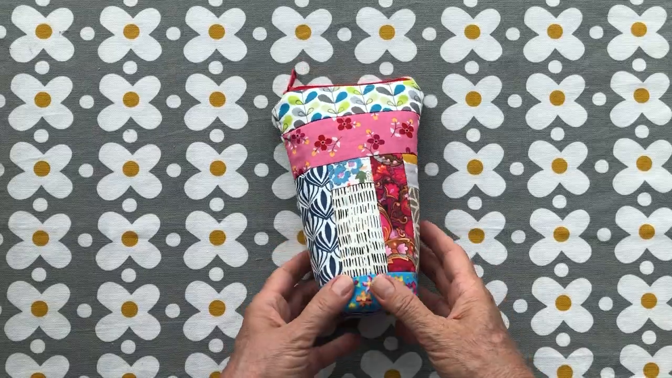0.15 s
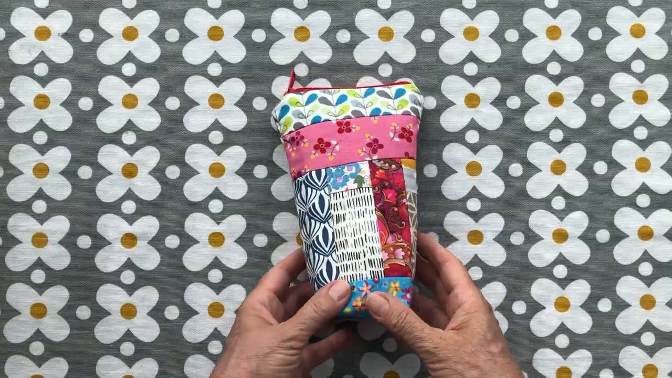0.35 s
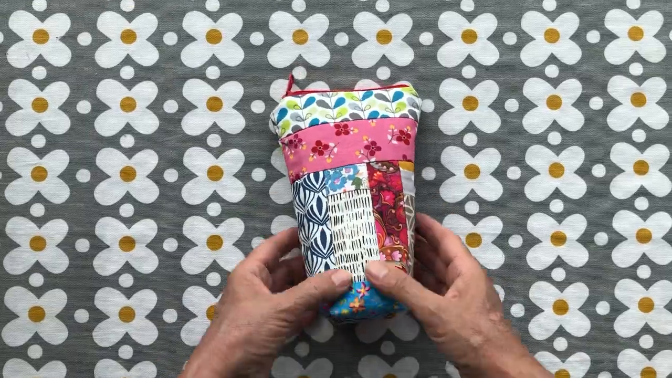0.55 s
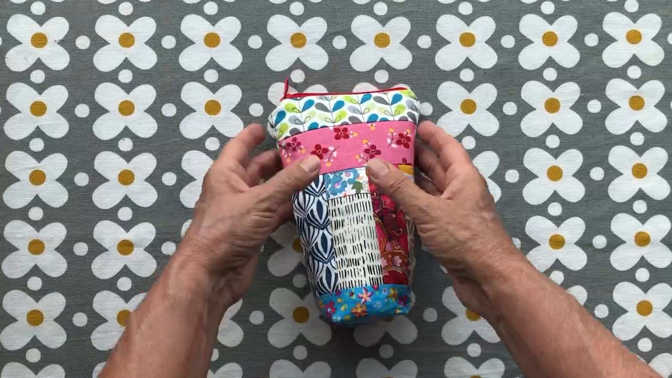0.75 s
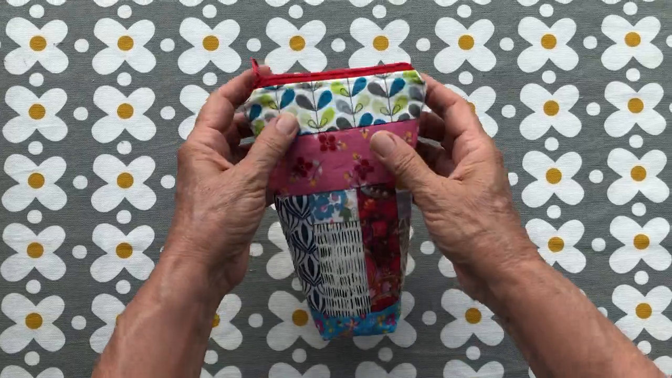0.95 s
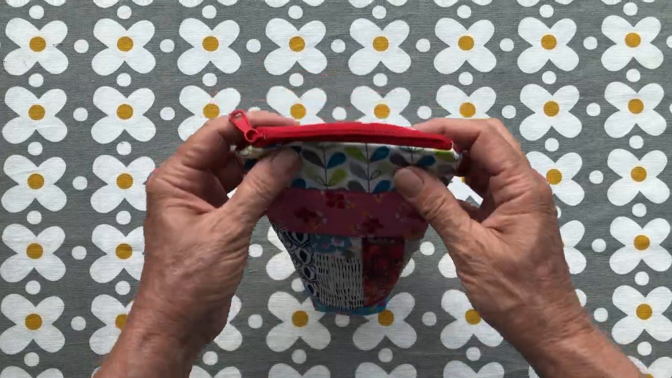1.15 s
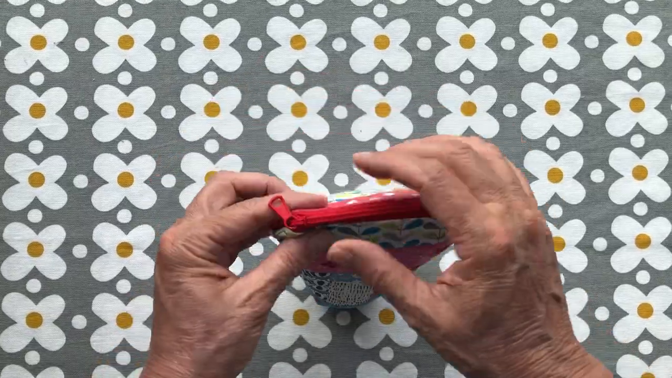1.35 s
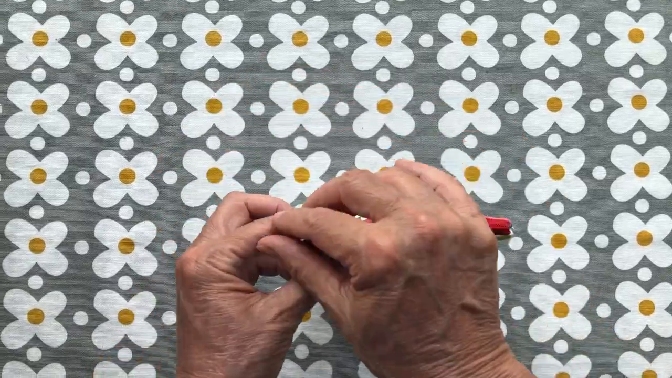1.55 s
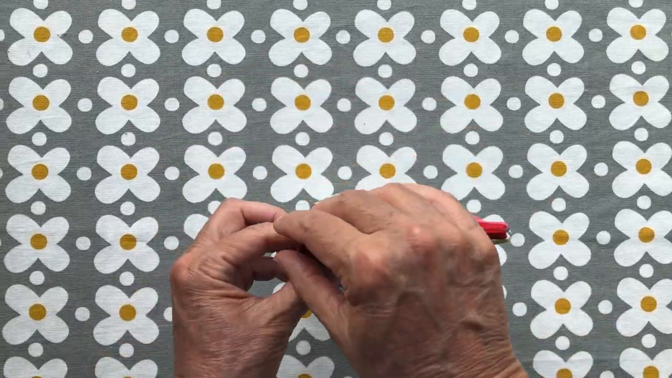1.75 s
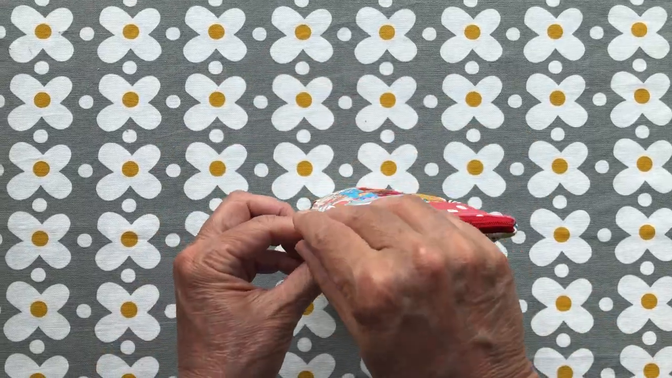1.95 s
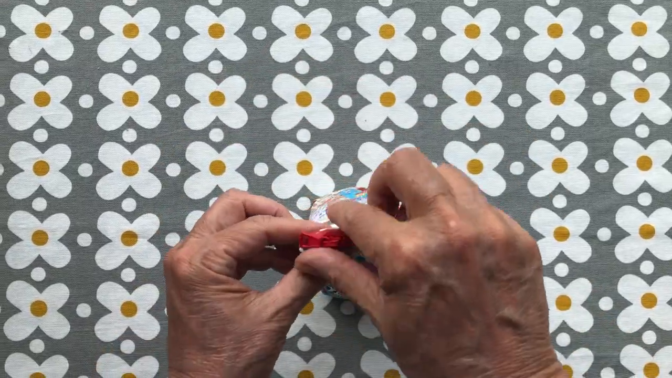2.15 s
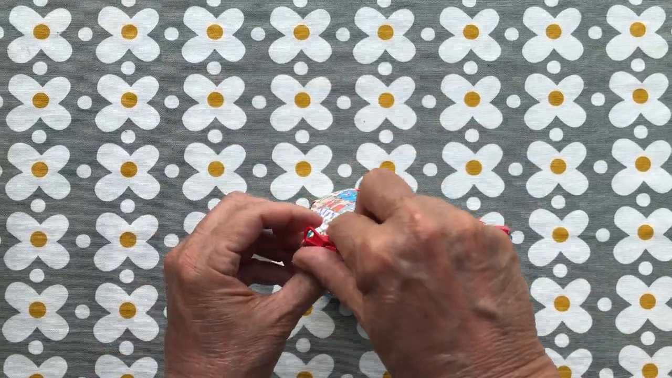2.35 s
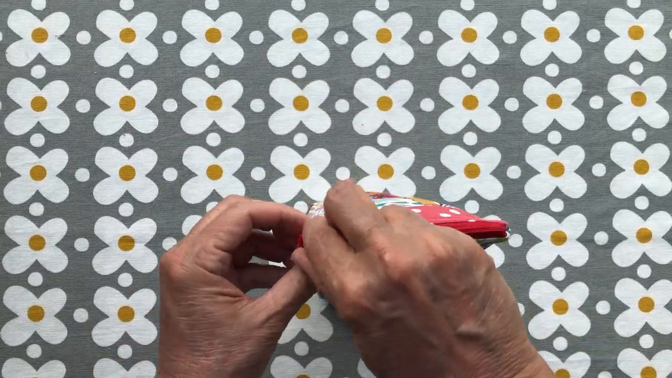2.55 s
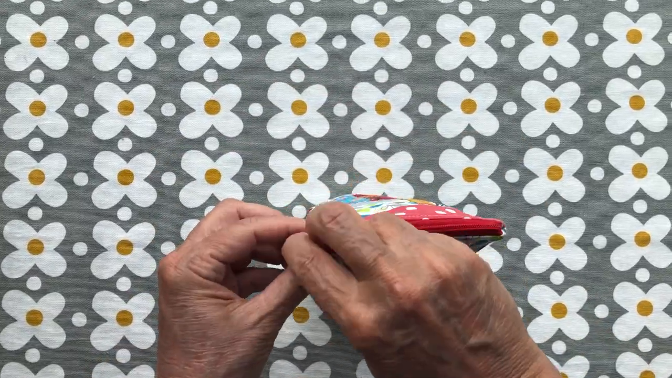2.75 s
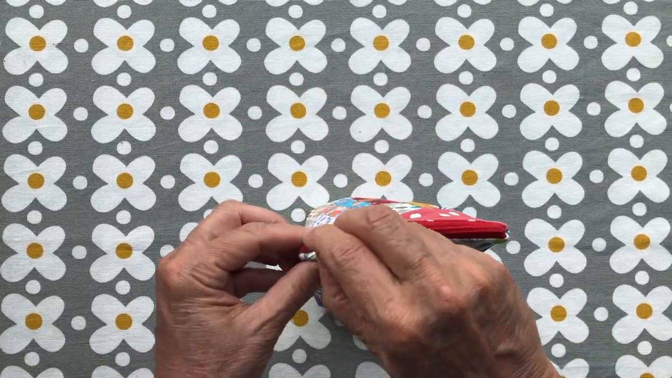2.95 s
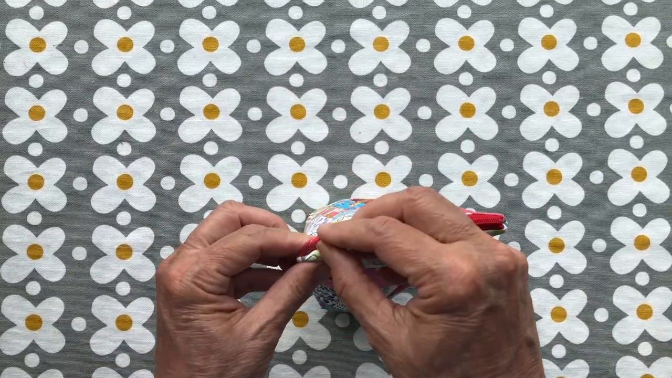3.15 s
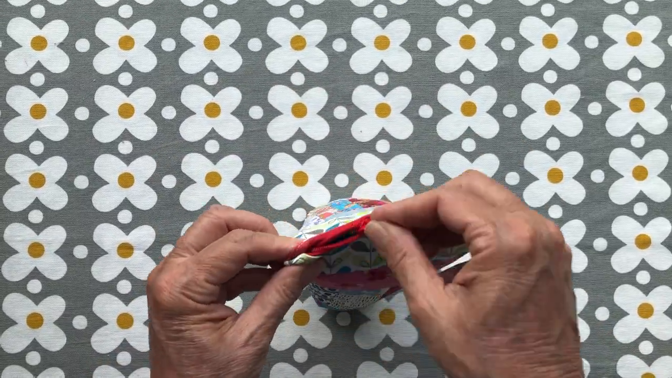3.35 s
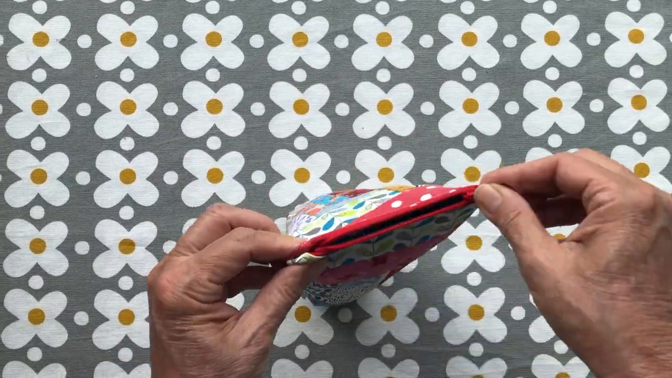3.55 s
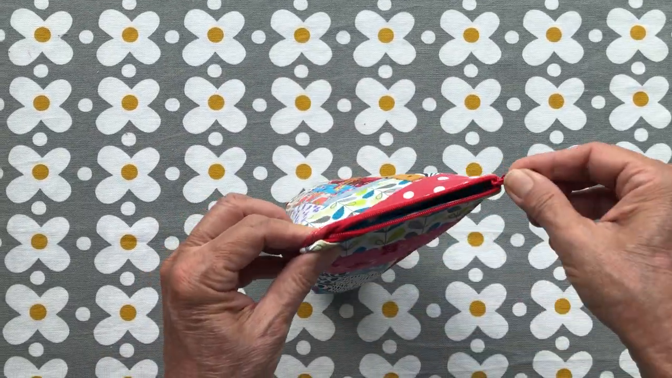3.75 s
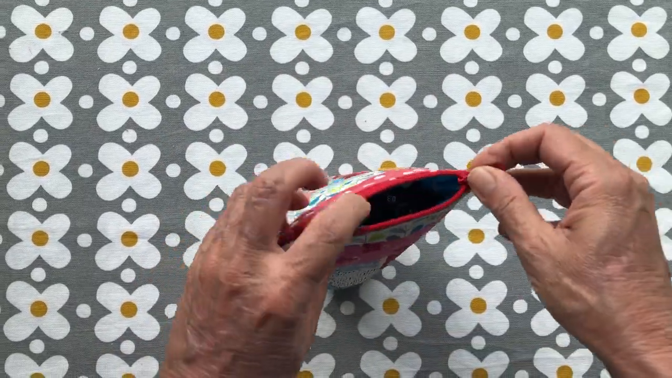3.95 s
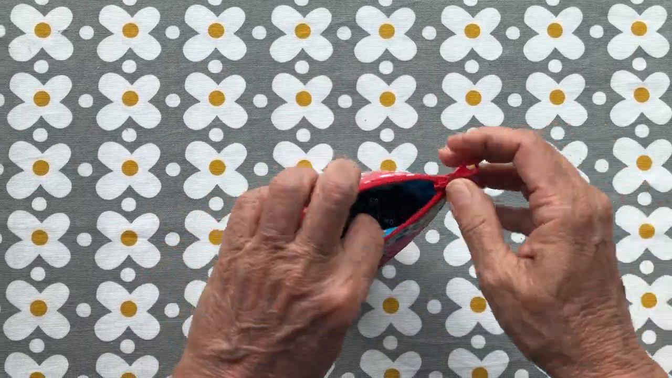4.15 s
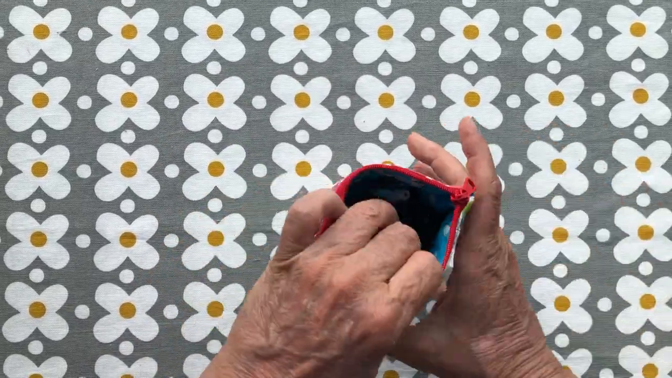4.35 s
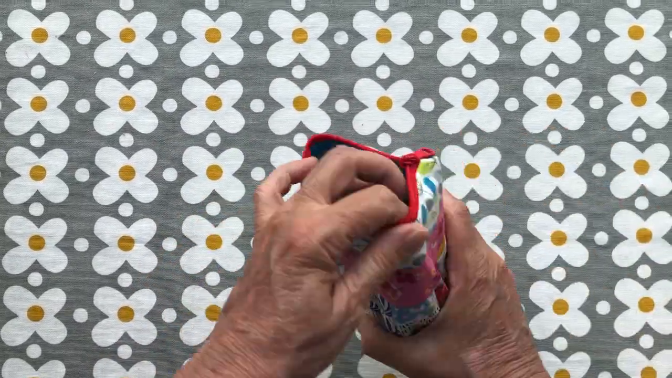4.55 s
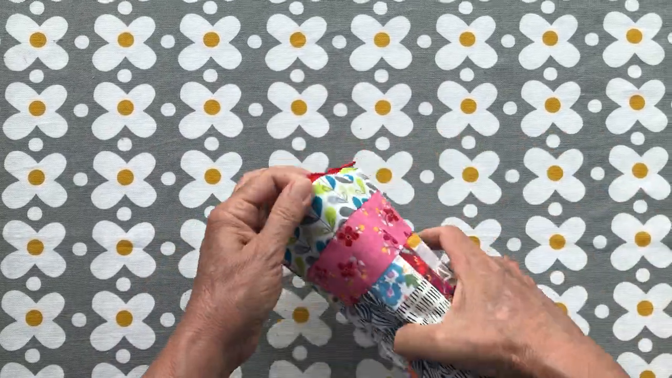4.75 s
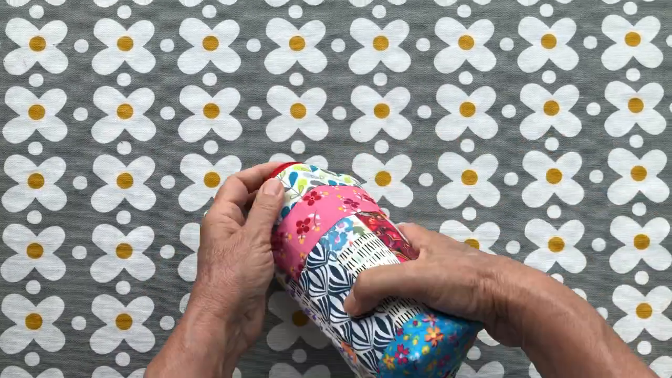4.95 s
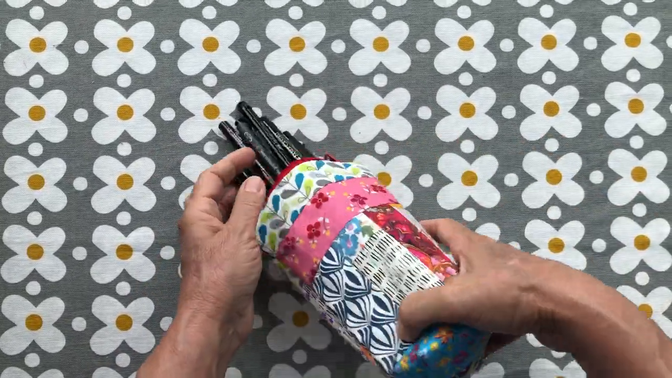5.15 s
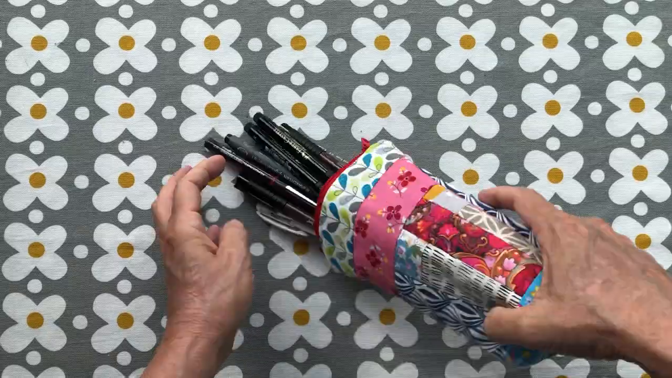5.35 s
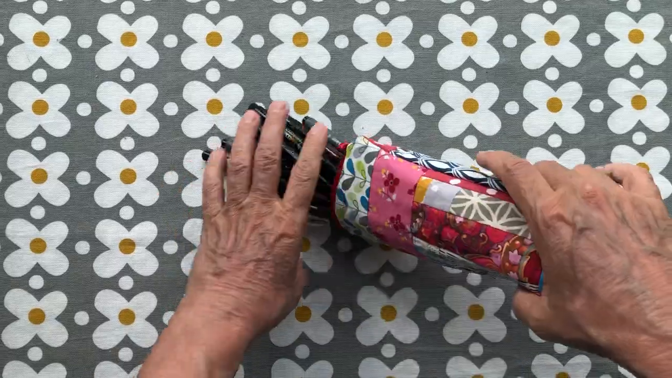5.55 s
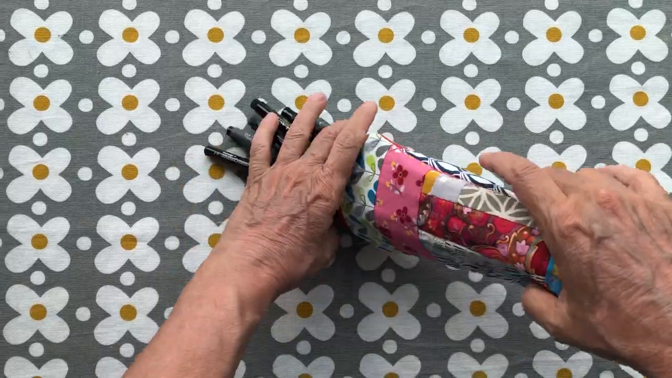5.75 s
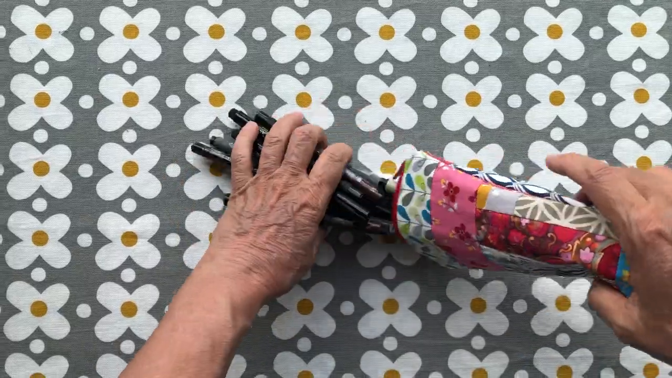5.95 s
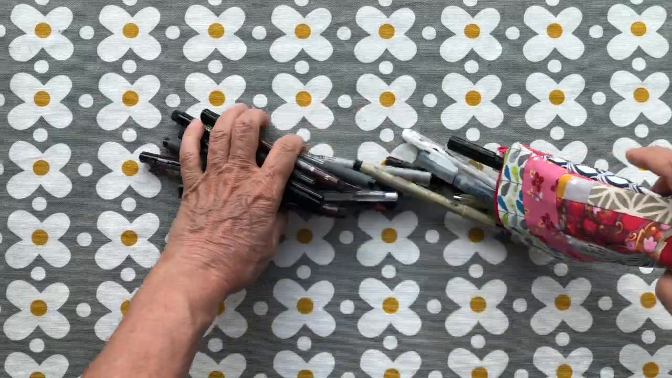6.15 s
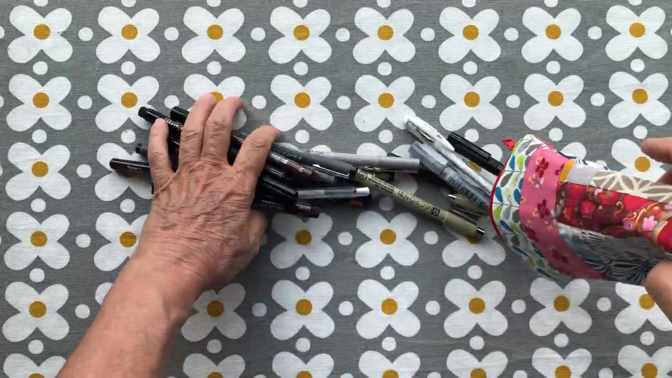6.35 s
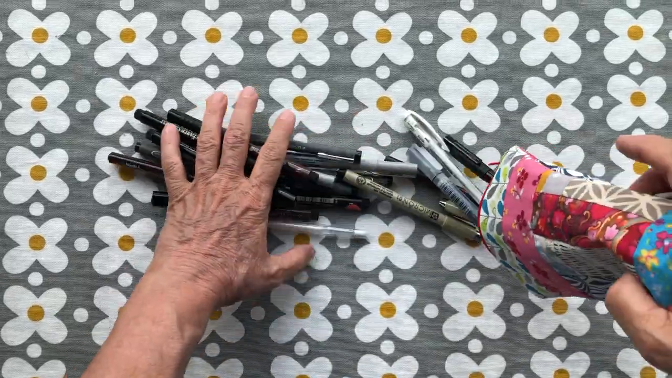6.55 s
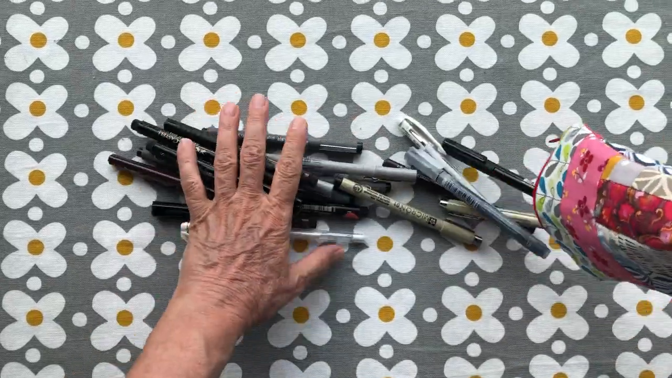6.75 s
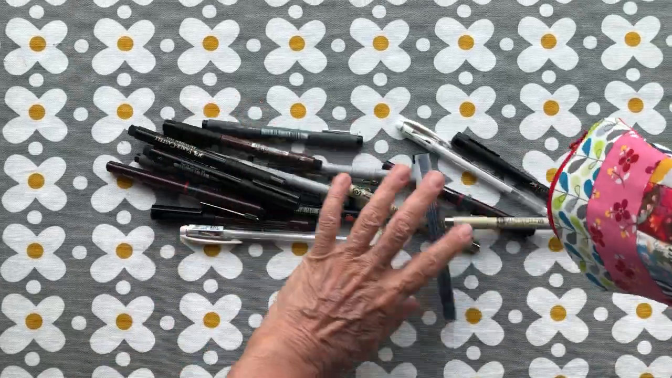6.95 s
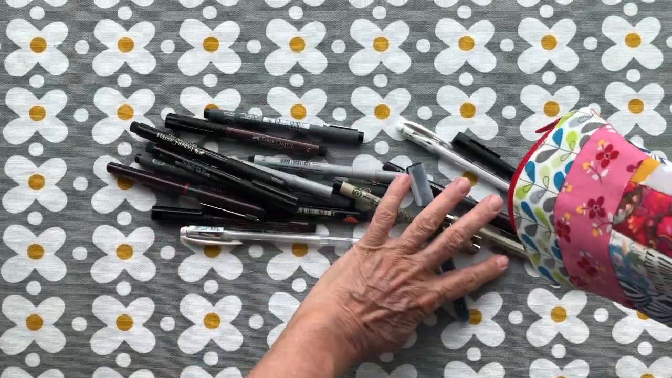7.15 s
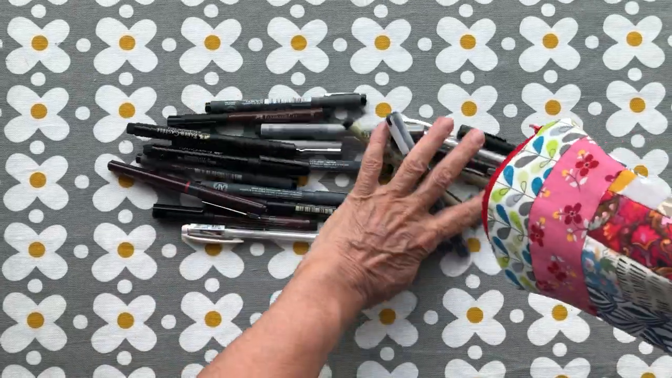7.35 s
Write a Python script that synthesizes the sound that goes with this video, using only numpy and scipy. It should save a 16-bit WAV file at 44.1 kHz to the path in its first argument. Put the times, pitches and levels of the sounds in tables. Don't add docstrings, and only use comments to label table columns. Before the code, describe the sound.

A close microphone in a quiet, dry room with faint low air. In the first 0.15 seconds plastic pens knock, muffled, inside a cloth pouch as it is picked up; fabric slides softly. Sparse faint ticks and rustles follow, with a soft thump on the wooden table near 1.35 and a tiny high metallic jingle around 1.5. It stays nearly still, with light strokes of skin on cloth, until 3.27, when a zipper slider clicks slowly, then speeds into a short rising buzz ending by 3.6. The opened pouch rustles and its pens rattle dully, busier from 4.4 to 4.7. From 4.93 pens spill in bright clacks with low table thuds, ease around 5.4, then pour densely from 5.85 to 6.25. Sharp single drops land near 6.5 and 6.65. From 6.9 to the end a hand spreads the heap, with clustered clicks, rolling and woody drumming.

```python
import sys
import numpy as np
from scipy import signal
from scipy.fft import rfft, irfft, next_fast_len
from scipy.io import wavfile
from scipy.ndimage import uniform_filter1d, map_coordinates

SR = 44100
rng = np.random.default_rng(int(sys.argv[2]) if len(sys.argv) > 2 else 0)


def store_wav(level_fs):
    pcm = np.round(np.clip(np.atleast_2d(level_fs), -1, 1) * 32767)
    wavfile.write(sys.argv[1], SR, pcm.T.astype(np.int16))


def nominal_scale(level):
    x = np.asarray(level, float) / 20
    return 10 ** x


N = 326340

# (time [s], peak [dB], ring [Hz], treble above the ring [dB])
CLOSED_KNOCKS = [(0.019, -60, 2220, -5.5), (0.0517, -55, 1830, -21), (0.0565, -53, 8870, -7),
                 (0.0612, -43.5, 2160, -17), (0.0746, -38.5, 2020, -25), (0.084, -36, 2500, -19.5),
                 (0.0912, -40, 7530, -11), (0.1019, -25, 5020, -20.5), (0.1136, -35.5, 5470, -1),
                 (0.8524, -54.5, 2540, -12.5), (0.8602, -47, 2350, -20), (0.8873, -57, 2060, -6.5),
                 (0.9904, -60, 3390, -19), (1.0412, -60, 4170, -15), (1.0559, -44.5, 2320, -11),
                 (1.2428, -57, 2450, -10), (1.2929, -57.5, 2670, -6), (1.3463, -45, 3280, -12),
                 (1.3626, -45.5, 4900, -12), (1.3829, -57, 4740, -15), (1.5234, -54.5, 3470, -10),
                 (1.5419, -57.5, 2400, -6), (1.5681, -68, 2310, 6), (1.583, -55, 2590, -18),
                 (1.6104, -78, 5700, -13), (1.6733, -78, 2210, -17), (1.7644, -58, 2290, -17),
                 (1.7954, -53, 2280, -7), (1.9537, -72, 2610, -9), (2.1136, -63.5, 1980, -14),
                 (2.3906, -65, 2330, -11), (2.4027, -66, 4290, -14), (2.6616, -62, 8870, -9),
                 (2.6915, -58.5, 6200, -8), (2.9744, -60, 2290, -10.5), (2.9898, -71, 4050, 2),
                 (3.1375, -75, 2320, -5.5), (3.2603, -57, 5180, -10)]
SLIDER_CLICKS = [(3.2743, -66, 5280, -6.5), (3.2874, -53, 4450, -11), (3.2982, -51.5, 4660, -17),
                 (3.3172, -51, 2120, -7), (3.3235, -49.5, 2870, -13), (3.328, -50, 5010, -15),
                 (3.3346, -50.5, 2320, -9), (3.3405, -48.5, 5180, -18), (3.349, -54, 1870, -12),
                 (3.3614, -58, 2180, -1), (3.3696, -60, 2060, -4), (3.3804, -59, 5270, -11),
                 (3.3915, -61, 2150, -15), (3.407, -57, 2080, -6), (3.421, -54, 2400, -12.5)]
OPENED_KNOCKS = [(3.6534, -50, 1980, -4), (3.6659, -46.5, 2840, -4.5), (3.6886, -59, 5430, -9),
                 (3.9504, -54.5, 4890, -16), (3.9614, -43.5, 3700, -19), (3.9783, -51.5, 8060, -5.5),
                 (4.1088, -56, 9260, -7), (4.2187, -74, 6180, -7), (4.2277, -64, 2020, -8),
                 (4.258, -57, 3520, 5.5), (4.263, -48, 3250, -11), (4.2816, -50.5, 3860, -16.5),
                 (4.317, -54, 5020, -16), (4.384, -45.5, 3180, -15), (4.4108, -53, 3270, -18),
                 (4.4609, -50.5, 2830, -14), (4.4829, -47, 5960, -9), (4.4922, -52.5, 2250, -7),
                 (4.4958, -50.5, 8620, -8), (4.52, -40.5, 2310, -5), (4.5414, -39, 4640, -15),
                 (4.5503, -47, 5430, -8.5), (4.5632, -45, 4990, -7), (4.5903, -41, 4850, -23),
                 (4.6319, -40.5, 5000, -23), (4.6356, -53, 4760, -10), (4.6537, -49, 9290, -5),
                 (4.6648, -43, 3540, -17), (4.6686, -44, 7030, -17), (4.6755, -37, 2960, -13.5)]
SPILL_KNOCKS = [(4.9285, -56, 5810, -8), (4.947, -32.5, 4200, -9.5), (4.9621, -51, 4150, -8),
                (4.987, -36.5, 3300, -19), (5.0013, -30, 7500, -13.5), (5.014, -36.5, 5050, -17),
                (5.0393, -34, 3490, -5), (5.0592, -29.5, 5440, -18), (5.0708, -39, 9620, -5),
                (5.0812, -27.5, 3520, -7), (5.1114, -29, 5080, -17), (5.121, -29, 5650, -17),
                (5.1329, -32, 3440, -11), (5.1374, -26.5, 3120, -9), (5.16, -41, 3260, 1),
                (5.1695, -35, 2866, -4), (5.2044, -41.5, 3580, -9), (5.2128, -35.5, 5570, -8.5),
                (5.2258, -38, 4850, -7), (5.2327, -36.5, 2360, -18), (5.2899, -49, 2530, -19),
                (5.3251, -44, 2330, -7), (5.3365, -36, 2600, -12.5), (5.3531, -52, 1520, -3.5),
                (5.433, -51, 1850, -8), (5.4682, -53, 5700, -18), (5.4983, -51, 7630, -9),
                (5.5183, -49.5, 3480, -21), (5.5459, -55, 2330, -12), (5.5505, -50.5, 4060, -6),
                (5.5627, -44, 2260, -17), (5.574, -55, 1730, -8), (5.5902, -61, 8670, -5),
                (5.6028, -36, 2520, -25), (5.606, -50, 2660, -9), (5.6193, -34.5, 3500, -17),
                (5.6254, -44, 8130, -11), (5.6477, -45, 4430, -13), (5.6601, -42.5, 2900, -11),
                (5.7211, -54.5, 2190, -21), (5.7483, -58, 5600, -7), (5.78, -43.5, 2270, -18)]
POUR_KNOCKS = [(5.8418, -42.5, 2580, -24), (5.85, -39.5, 4060, -5), (5.8655, -41, 2510, -14),
               (5.885, -37, 3300, -17), (5.8943, -38, 2990, -14.5), (5.9113, -34.5, 2830, -17),
               (5.9262, -37, 3040, -27), (5.944, -32.5, 3170, -28), (5.9628, -36, 5670, -6),
               (5.9672, -37.5, 2290, -16.5), (5.9743, -39, 3740, -15), (5.9786, -37, 4150, -15),
               (5.9876, -32.5, 3120, -14), (6.005, -33, 2940, -9), (6.0094, -24.5, 4060, -10),
               (6.0325, -52, 3950, -11), (6.0367, -30, 3390, -19), (6.055, -38, 3070, -8),
               (6.0713, -35, 4930, -21), (6.0825, -34, 3320, -19), (6.094, -28.5, 4370, -13),
               (6.109, -30, 6600, -11), (6.1257, -32.5, 3160, -20), (6.131, -45, 2860, 1),
               (6.1371, -34, 2760, -9), (6.1563, -24, 4550, -14), (6.1696, -32, 3330, -5),
               (6.1961, -40, 4980, -16), (6.2151, -39.5, 8990, -7), (6.2276, -38, 3270, -2),
               (6.2357, -34, 4810, -13), (6.2399, -27.5, 5070, -11), (6.2602, -34.5, 4800, -10),
               (6.3129, -56.5, 2850, -5), (6.3305, -55.5, 2610, -19.5), (6.3376, -69, 2780, -6),
               (6.3651, -66, 2570, -9.5), (6.3795, -61, 5040, -13.5)]
SPREAD_KNOCKS = [(6.4024, -44, 3860, -17), (6.4345, -43.5, 4300, -12), (6.4615, -43, 2470, -13),
                 (6.4671, -47.5, 4110, -8), (6.48, -45, 3260, 0), (6.5059, -18, 3523, -19),
                 (6.5475, -37, 4890, -7.5), (6.552, -33.5, 4240, 1), (6.562, -34, 3460, -13),
                 (6.5867, -47, 2250, -6), (6.6144, -41.5, 4760, -7.5), (6.6496, -19.5, 4300, -15.5),
                 (6.6703, -36.5, 1270, -10), (6.7025, -51, 1140, -5), (6.7248, -36, 4280, -15),
                 (6.7532, -40.5, 4200, -25), (6.7656, -47.5, 2560, -18), (6.8029, -57, 9280, -12),
                 (6.8229, -40, 2224, -14), (6.8397, -33, 2900, -16.5), (6.8674, -52, 3890, -5),
                 (6.8819, -48, 5720, -19)]
SWEEP_KNOCKS = [(6.9109, -30, 2804, -14), (6.9347, -21, 1904, -18.5), (6.9377, -22, 2435, -24),
                (6.9513, -37, 1900, -9.5), (6.9612, -39.5, 2290, -3), (6.983, -36.5, 2920, -17),
                (6.9921, -46, 1700, 3), (7.0013, -41, 2930, -19), (7.0058, -46.5, 1280, 5),
                (7.0097, -42.5, 2920, -5), (7.0313, -44, 3230, -21), (7.0384, -50, 3120, -27),
                (7.0502, -43.5, 5380, -15), (7.0582, -36, 3000, -18), (7.0742, -43, 3330, -10.5),
                (7.0885, -59, 4380, -5), (7.114, -37, 1310, -25), (7.1196, -45, 2220, -24),
                (7.1407, -37.5, 5200, -3.5), (7.1754, -40.5, 4560, -17), (7.1944, -56, 3960, -12),
                (7.2004, -51, 1610, -23), (7.2149, -51, 1220, -17), (7.2252, -55, 1160, -13),
                (7.2334, -59, 1430, -10), (7.2457, -35.5, 4590, -3), (7.2724, -52, 4700, -10),
                (7.2911, -40, 5700, -13), (7.2943, -32, 3670, -13), (7.3098, -36, 4540, -16),
                (7.331, -51, 2537, -14), (7.343, -40, 2390, -12.5), (7.3556, -28.5, 4020, -13),
                (7.3692, -29.5, 5450, -8.5), (7.3757, -27.5, 3350, -19), (7.3884, -33, 6090, -10)]
FURTHER_KNOCKS = [
    (0.0642, -40, 2090, -14),
    (0.0938, -32, 2370, -22),
    (1.104, -47, 4400, -3.5),
    (5.077, -30.5, 2640, -7),
    (5.1411, -28.5, 3200, -7),
    (6.499, -45.5, 1900, -15),
    (6.51, -37, 5000, -4),
    (6.569, -39, 3560, -8.5),
    (6.621, -48, 1610, -23),
]
# (time [s], tooth rate [teeth/s], level [dB])
ZIP_STROKE = [
    (3.285, 172, -58),
    (3.335, 165, -53),
    (3.385, 105, -61),
    (3.43, 250, -53),
    (3.457, 350, -46),
    (3.478, 489, -50),
    (3.5, 598, -46),
    (3.535, 652, -48),
    (3.6, 560, -69),
]
# (centre [Hz], width [Hz], gain [dB])
POUCH_MODES = [(350, 95, 0), (600, 330, 0), (1190, 210, 2), (1950, 190, 1), (2480, 260, -4),
               (5000, 700, -5)]
# (time [s], peak [dB], pitch [Hz])
TAB_RINGS = [
    (1.5229, -60.5, 11700),
    (1.54, -58, 11760),
    (1.5673, -62, 11600),
    (1.796, -70, 11800),
    (4.2572, -51, 11480),
]
# (peak time [s], 10 dB swell [s], 10 dB fade [s], rustle [dB], table drumming above rustle [dB])
POUCH_MOVES = [(0.105, .02, .03, -48, -14), (0.062, .03, .2, -60, -6), (0.6, 0.025, 0.8, -64, 1),
               (1.081, 0.22, 0.012, -56.5, -12), (1.2, 0.1, 0.14, -67, -2), (1.355, .006, .025, -50, -2),
               (1.57, 0.04, 0.3, -69, -2.5), (2.49, 0.07, 0.04, -68, -2), (2.81, 0.1, 0.04, -74, -6),
               (3.56, 0.1974, 0.05, -58, -10.5), (3.669, 0.006, 0.008, -52, -13),
               (3.968, 0.0326, .02, -59, -23), (4.1, .1, .15, -69, -4), (4.3, 0.03, .022, -54, -13),
               (4.395, .01, .022, -58, -14), (4.55, 0.04, 0.0284, -54, -25), (4.67, 0.09, 0.04, -57, -28),
               (4.83, .07, .2, -63, -8)]
# (peak time [s], 10 dB swell [s], 10 dB fade [s], rustle [dB], table drumming above rustle [dB])
PEN_MOVES = [(4.955, 0.0536, 0.26, -51.5, -12.5), (5.128, 0.0824, 0.02, -40.5, -11),
             (5.229, 0.0943, 0.13, -53, 1.5), (5.6, .5, -0.3, -62, -1), (5.86, 0, 0.2, -53.5, -12),
             (6.0, 0.12, 0.2, -47.5, -5), (6.251, 0.27, 0.11, -52.5, 7), (6.47, 0, 0.24, -57, 6.5),
             (6.671, 0.02, 0.1, -63, 24), (6.85, -0.43, -0.1, -63, -6), (6.944, 0, 0.13, -48.5, 5),
             (7.17, -0.03, 0.2, -64, 11.5), (7.309, -0.07, 4.82, -57, -4), (7.4, 0.06, 1.33, -48, -1.5)]
# (peak time [s], 10 dB swell [s], 10 dB fade [s], level [dB])
SKIN_GLIDES = [
    (0.572, .012, 1.2, -70),
    (2.165, .06, .012, -70),
    (2.7, .03, .03, -75),
    (3.03, .03, .03, -75),
    (3.91, .012, .1, -70),
    (4.075, .006, .08, -66),
]
# (frequency [Hz], density [dB])
CLOTH_COLOUR = [(290, -4.5), (500, -4), (736, -6), (984, -4), (2060, -7), (9000, -18), (11700, -55),
                (19800, -120)]
# (frequency [Hz], density [dB])
HISS_COLOUR = [(3000, -7), (6000, 1), (9000, -1), (16000, -3.5)]
# (time [s], level [dB], hardness [dB])
TABLE_BLOWS = [(0.064, -40, -27), (0.092, -30.5, -19), (1.344, -23.5, -25), (1.361, -40, -17),
               (3.667, -44.5, -1.5), (4.934, -38.5, -11), (5.085, -19, -8.5), (5.109, -20.5, -16.5),
               (5.13, -35, -18.5), (5.15, -24.5, -35), (5.333, -32, -16.5), (5.619, -41, -11.5),
               (5.85, -47, -14), (5.909, -49, -18.5), (6.038, -37.5, -1), (6.094, -25, -14),
               (6.197, -30.5, -16), (6.24, -32.5, -26.5), (6.255, -30.5, -8), (6.504, -33, -20),
               (6.548, -30.5, -7), (6.653, -27, -11), (6.671, -27, -3), (6.711, -33.5, -10.5),
               (6.935, -25, 2), (7.005, -34.5, -3), (7.115, -32, -3), (7.178, -35.5, -16), (7.217, -32, -9),
               (7.346, -38, -16), (7.376, -36, -28)]
# (frequency [Hz], level [dB], t60 [s])
TABLE_MODES = [(51.55, -16.5, 0.23), (87, -16.5, 0.19), (143.4, -3, 0.3), (220.4, -7.5, 0.23),
               (299.65, -2, 0.076), (352.4, -4, 0.094), (414.1, -4, 0.096), (500, -8, 0.2)]
# (frequency [Hz], t60 [s])
ECHO_DECAY = [(500, 0.32), (3000, 0.042), (12000, 0.036)]
# (frequency [Hz], density [dB])
ROOM_COLOUR = [(41, -42), (70, -8), (189, -7.5), (237, -11), (284, -10), (325, -11), (373, -11.5),
               (15500, -47)]


def pens():
    in_cloth = CLOSED_KNOCKS + SLIDER_CLICKS + OPENED_KNOCKS
    in_open = SPILL_KNOCKS + POUR_KNOCKS + SPREAD_KNOCKS + FURTHER_KNOCKS + SWEEP_KNOCKS
    muffled = knocks(*np.transpose(in_cloth), snap_s=0.0081, rattle_db=-18)
    clear = knocks(*np.transpose(in_open), snap_s=0.0081, rattle_db=-22)
    return muffled + clear + patter()


def patter():
    rustle_db = handling()[0]
    when, strength, pitch, brightness = rng.random((900, 4)).T
    s = when * (N - 1) / SR
    busy_db = rustle_db[(s * SR).astype(int)]
    db = busy_db + 0.09 * (busy_db + 70) - 1.74 * np.log(0.083 + strength)
    db = db - 6 * (s < ZIP_STROKE[0][0])
    return knocks(s, db, 1900 * np.exp(1.136 * pitch), -14 + 12 * brightness, snap_s=0.018, rattle_db=-11.5)


def knocks(s, db, hz, treble_db, snap_s, rattle_db):
    t = np.arange(2048) / SR
    f = np.fft.rfftfreq(len(t), 1 / SR) + 1
    hump = bursts(np.exp(-(np.log2(f / hz[:, None]) / 0.94) ** 2))
    tick = bursts(np.ones((len(s), 1)) / (1 + (6000 / f) ** 6) / (1 + f / 9000))
    life = snap_s * np.exp(0.189 * rng.standard_normal((len(s), 1)))
    life = life * (3500 / hz)[:, None] ** 0.55
    body = hump * (nominal_scale(-6.5 - 60 * t / (1.4 * life)) + nominal_scale(rattle_db - 60 * t / 0.0968))
    mode = np.sin(2 * np.pi * hz[:, None] * t) * nominal_scale(4.5 - 60 * t / (0.44 * life))
    tick_decay = nominal_scale(-60 * t / 0.007) + nominal_scale(rattle_db - 1.5 - 60 * t / 0.086)
    bright = nominal_scale(treble_db + 4)[:, None] * tick * tick_decay
    attack = 1 - np.exp(-t / 0.000138)
    shape = (body + mode + bright) * attack
    return scatter(np.round(s * SR).astype(int), nominal_scale(db)[:, None] * shape)


def zipper():
    slow_rate, brake_s = 304, 3.51
    rate, teeth_db = curves(ZIP_STROKE)
    t = np.arange(N) / SR
    braking = t > brake_s
    starting = np.clip((t - ZIP_STROKE[0][0]) / 0.004, 0, 1)
    stopping = np.clip((ZIP_STROKE[-1][0] - t) / 0.062, 0, 1)
    moving = starting * stopping
    unevenness = (16 / rate + 0.04 * braking) * wobble(120)
    teeth = np.cumsum(rate * (1 + unevenness) * (moving > 0)) / SR
    since_tooth = teeth % 1

    ticks = np.diff(np.floor(teeth), prepend=0) * nominal_scale(700 / rate * rng.standard_normal(N))
    grit_db = -8 - 10 * (rate > slow_rate) + 5 * braking
    grit = nominal_scale(grit_db) * rng.standard_normal(N) * np.exp(-3 * since_tooth)
    drive = ticks + grit
    sharpness = nominal_scale(-12 + 13 * np.clip((rate - 400) / 200, 0, 1))
    sharp_drive = sharpness * drive
    damped = nominal_scale(-11 * np.clip((t - brake_s) / 0.02, 0, 1))
    peaks = [(hz, width, nominal_scale(level)) for hz, width, level in POUCH_MODES]
    low = damped * (resonant(drive, peaks[:1]) - resonant(sharp_drive, peaks[1:3]))
    buzz = levelled(low - resonant(sharp_drive, peaks[3:]), 900)

    pulse = levelled(np.exp(-since_tooth * 350 / rate), 1500)
    scrape = pulse * noise([(2500, 2.0), (4500, -0.5), (8000, 1.0), (16000, -5)])
    scrape_db = -12 + 0.0243 * np.clip(rate - slow_rate, 0, None)
    return moving * nominal_scale(teeth_db) * (buzz + nominal_scale(scrape_db) * scrape)


def tab():
    s, db, hz = np.transpose(TAB_RINGS)
    t = np.arange(2000) / SR
    phase = 2 * np.pi * hz[:, None] * t
    ring = nominal_scale(-60 * t / 0.039) * (np.sin(phase) + 0.22 * np.sin(0.92 * phase))
    return scatter(np.round(s * SR).astype(int), nominal_scale(db + 5.5)[:, None] * ring)


def table():
    s, db, hard_db = np.transpose(TABLE_BLOWS)
    start = np.round(s * SR).astype(int) - 60
    push = np.hanning(round(0.0023 * SR))[None] / (0.0032 * SR)
    soft = scatter(start, nominal_scale(db + 53)[:, None] * push)
    modes = [(hz, np.log(1000) / np.pi / t60, nominal_scale(level) * t60 * 7.05) for hz, level, t60 in TABLE_MODES]

    t = np.arange(2048) / SR
    f = np.fft.rfftfreq(len(t), 1 / SR) + 1
    wood = bursts(np.exp(-(np.log2(f / 480) / 1.57) ** 2) * np.ones((len(s), 1)))
    decay = nominal_scale(-60 * t / 0.1) * (1 - np.exp(-t / 0.00035))
    knock = scatter(start, nominal_scale(db + hard_db - 6)[:, None] * wood * decay)

    friction = uniform_filter1d(rng.standard_normal(N), size=60)
    rub = unit(resonant(friction, modes)) * nominal_scale(handling()[1] - 1 + 0.95 * wobble(14))
    return resonant(soft, modes) + knock + rub


def cloth():
    t = np.arange(N) / SR
    lifted = t < 1
    rustle_db = handling()[0]
    clumps = (1.4 * wobble(30) + 2 * wobble(120)) * np.where(lifted, 0.4, 1)
    body = nominal_scale(rustle_db - 4 + clumps) * noise(CLOTH_COLOUR)
    hiss_db = -74 + 0.57 * (rustle_db + 65)
    hiss_db = hiss_db - 5.5 * (t > PEN_MOVES[0][0])
    hiss = nominal_scale(hiss_db + clumps + 0.34 * wobble(53)) * noise(HISS_COLOUR)
    lift_glide = lifted * nominal_scale(swells(*SKIN_GLIDES[0], -120))
    glide = nominal_scale(swells(*np.transpose(SKIN_GLIDES[1:]), -120)) + lift_glide
    return body + hiss + glide * noise(HISS_COLOUR)


def handling():
    *timing, db, drum_db = np.transpose(POUCH_MOVES + PEN_MOVES)
    return swells(*timing, db, -95), swells(*timing, db + drum_db, -85.5)


def swells(s, swell, fade, db, rest_db):
    t = np.arange(0, N / SR, 1 / 1000)[:, None]
    distance = np.where(t < s, (s - t) / np.abs(swell), (t - s) / np.abs(fade))
    power = nominal_scale(2 * db - 20 * distance)
    level_db = 10 * np.log10(power.sum(axis=1) + nominal_scale(2 * rest_db))
    return curves(np.transpose([t[:, 0], level_db]))[0]


def sway():
    weight_db = uniform_filter1d(handling()[1], size=int(0.21 * SR))
    sway_db = -72.5 + 0.35 * (weight_db + 78.5) + 2.2 * wobble(12)
    return nominal_scale(sway_db) * noise([(30, -33), (45, 6.0), (105, 4), (135, -31.5)])


def room(x):
    wet, block = np.zeros(N + SR), SR // 10
    for a in range(0, N, block):
        hz, t, z = signal.stft(rng.standard_normal(SR // 5), SR, nperseg=128)
        decay = nominal_scale(-60 * t / along(ECHO_DECAY, hz)[:, None])
        tail = signal.istft(z * decay, SR, nperseg=128)[1]
        part = signal.fftconvolve(x[a:a + block], tail / np.linalg.norm(tail))
        wet[a + 60:][:len(part)] += part
    return wet[:N]


def room_tone():
    return nominal_scale(-71.5 + 3.3 * wobble(4.504)) * noise(ROOM_COLOUR)


def unit(x):
    return x / np.sqrt(np.mean(x ** 2) + 1e-20)


def levelled(x, size):
    return x / np.sqrt(np.abs(uniform_filter1d(x ** 2, size=size)) + 1e-12)


def along(points, hz):
    f, v = np.transpose(points)
    return np.interp(np.log(hz + 1), np.log(f + 1), v)


def curves(rows):
    s, *cols = np.transpose(rows)
    return [np.interp(np.arange(N) / SR, s, c) for c in cols]


def wobble(rate):
    return map_coordinates(rng.standard_normal(int(N * rate / SR) + 4), [np.arange(N) * rate / SR])


def filtered(x, response):
    m = next_fast_len(N + SR // 2)
    return irfft(rfft(x, m) * response(np.fft.rfftfreq(m, 1 / SR)), m)[:N]


def noise(spectrum):
    def colour(hz):
        return nominal_scale(along(spectrum, hz)) * (hz > spectrum[0][0] / 2)
    return unit(filtered(rng.standard_normal(N), colour))


def bursts(colour):
    rows = irfft(rfft(rng.standard_normal((len(colour), 2048))) * colour)
    return rows / np.sqrt(np.mean(rows ** 2, axis=1, keepdims=True))


def resonant(x, peaks):
    def response(f):
        total = 0
        for k, (c, w, g) in enumerate(peaks):
            total = total + (-1) ** k * g * 1j * f * w / (c * c - f * f + 1j * f * w)
        return total
    return filtered(x, response)


def scatter(start, shapes):
    where = start[:, None] + np.arange(shapes.shape[1])
    return np.bincount(where.ravel(), shapes.ravel(), N + shapes.shape[1])[:N]


def scene():
    sharp = pens() + tab()
    echo = nominal_scale(-8.5) * room(sharp)
    mix = sharp + zipper() + echo + table() + cloth() + sway() + room_tone()
    return mix[None]


def roll_off(x):
    return signal.sosfilt(signal.butter(12, 16950, fs=SR, output="sos"), x)


def record(dry):
    def response(hz):
        bass_cut = (1j * hz / (35 + 1j * hz)) ** 3
        return bass_cut * np.where(hz > 15700, nominal_scale(-15), 1)
    mix = filtered(dry[0], response)[None]
    return roll_off(mix)


dry = scene()
out = record(dry)
store_wav(out)
```